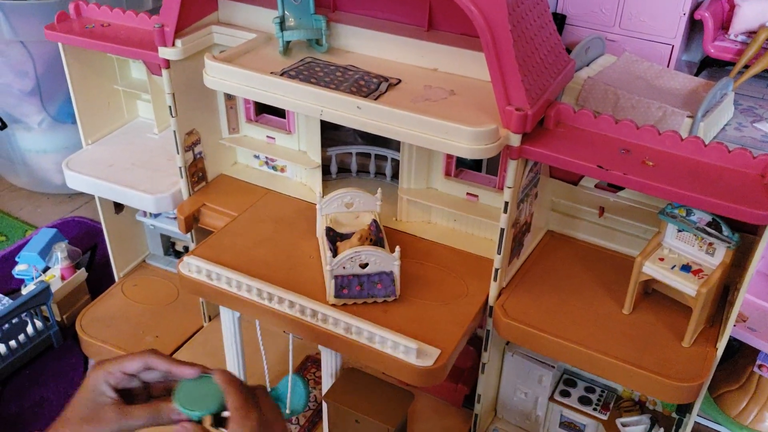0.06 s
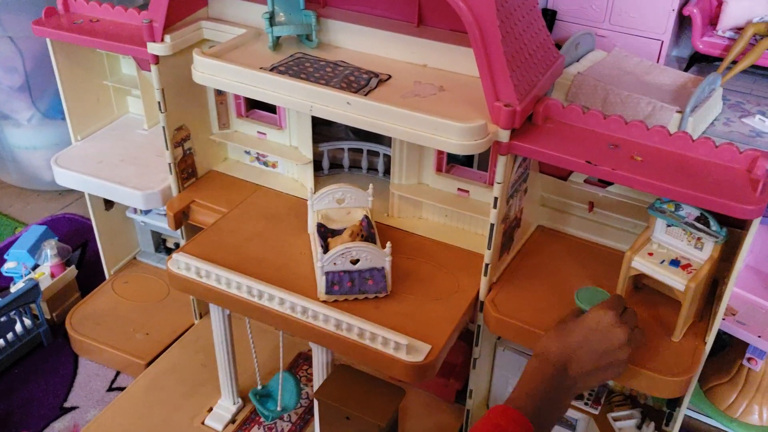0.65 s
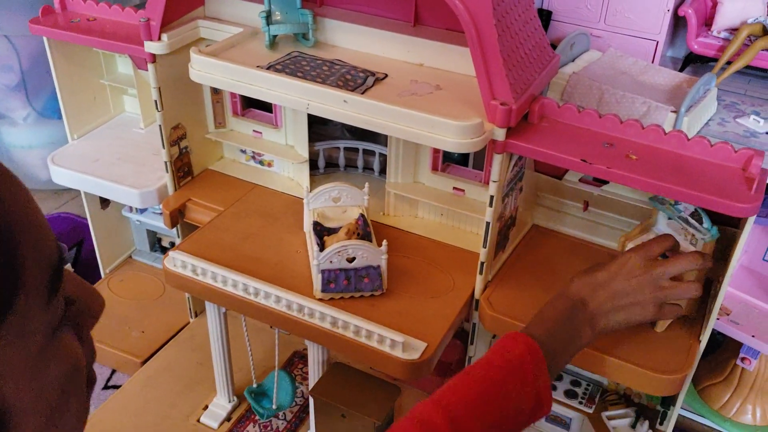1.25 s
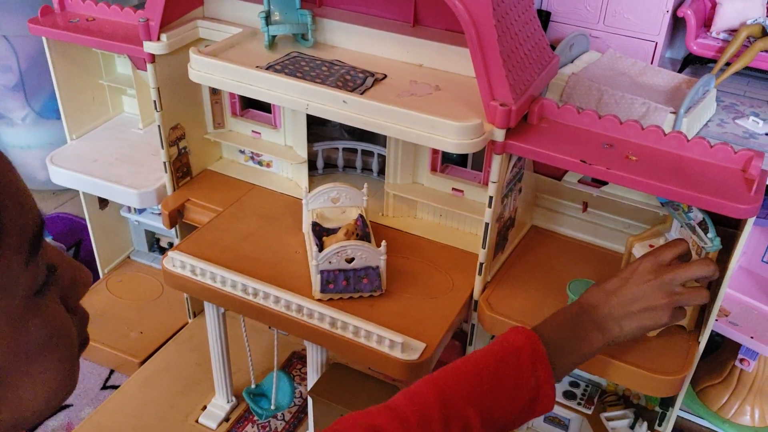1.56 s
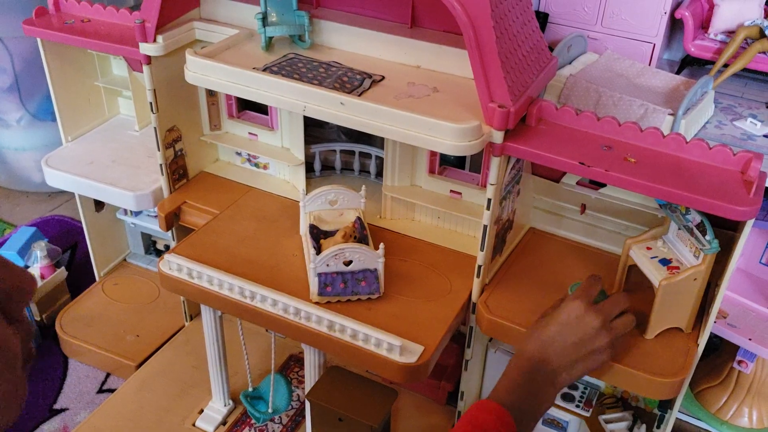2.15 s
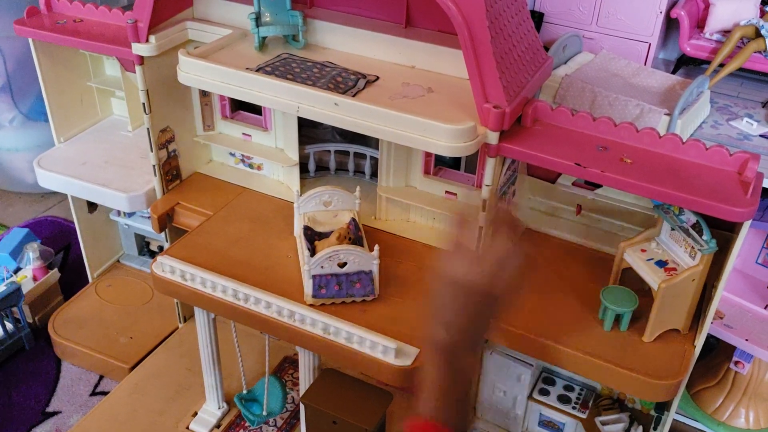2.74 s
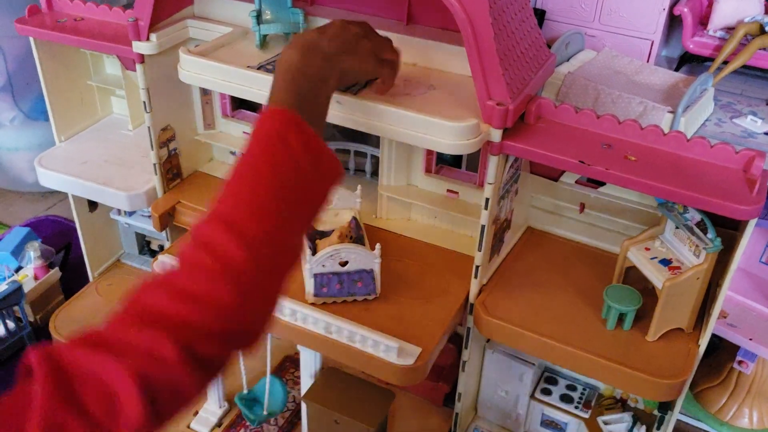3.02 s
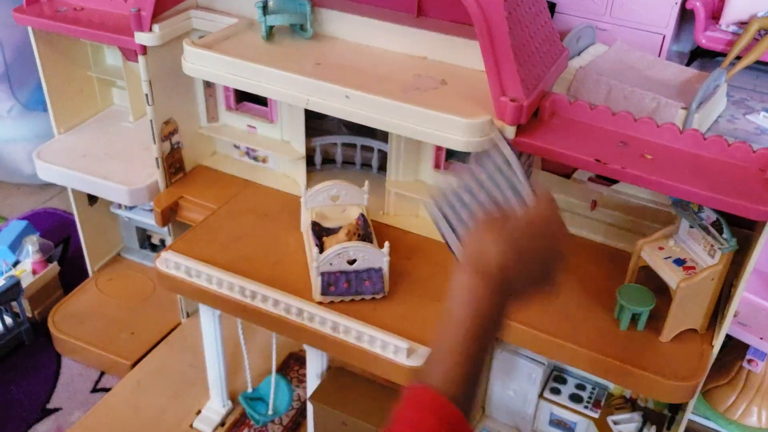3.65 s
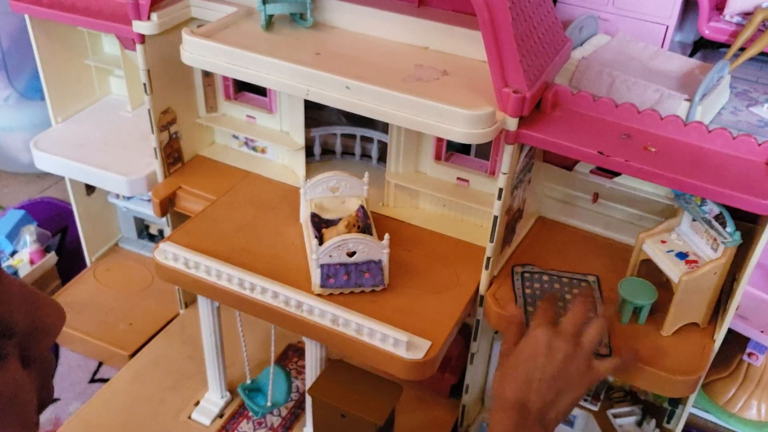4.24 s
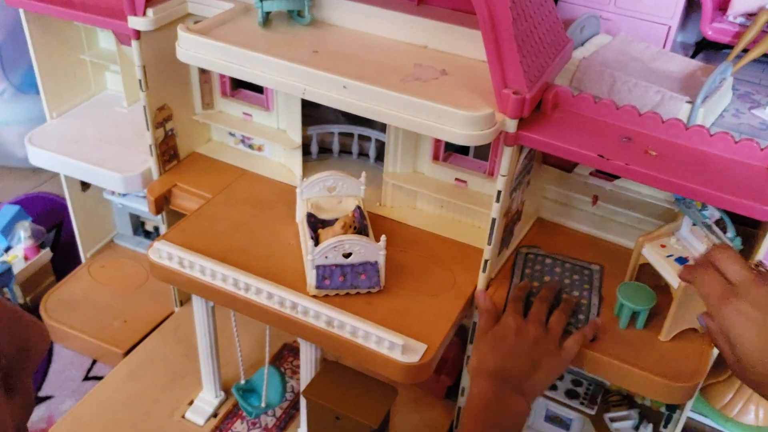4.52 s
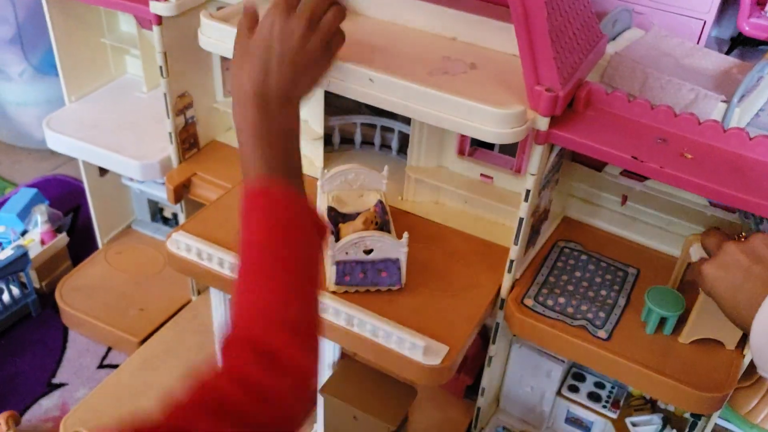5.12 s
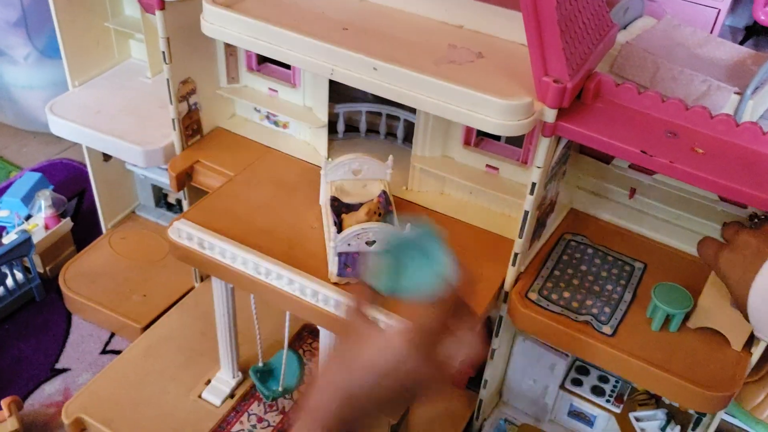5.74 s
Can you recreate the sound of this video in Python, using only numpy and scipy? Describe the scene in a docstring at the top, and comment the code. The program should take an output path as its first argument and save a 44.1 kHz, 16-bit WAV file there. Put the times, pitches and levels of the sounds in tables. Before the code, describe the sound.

Close to a plastic toy house in a quiet room, a hand rearranges tiny furniture. A stool lands with a hollow tap, then a vanity bumps and scrapes across the floor panel. In a softer stretch, a cloth rug is pulled away and brushed flat with a light hiss. The ending is busier, with crisp clicks, more dragging and the brief clatter of a small chair being lifted.

```python
"""Furnishing a toy house

Close to a hollow plastic toy house in a quiet room, in stereo. A hand sets down a stool, nudges and
drags a vanity, slides a cloth rug off the roof terrace and smooths it flat; a chair clatters as it is
picked up. Knocks ring the toys' shells, the floor panels and the frame; dragged feet stick and slip."""
import sys
import numpy as np
from scipy import signal
from scipy.fft import rfft, irfft, next_fast_len
from scipy.io import wavfile
from scipy.ndimage import uniform_filter1d

SR = 44100
rng = np.random.default_rng(int(sys.argv[2]) if len(sys.argv) > 2 else 0)


def wrap_up_sound(samples):
    """Save the sound to the file named by the first command line argument, as 16-bit audio."""
    columns = np.atleast_2d(samples).T
    # keep every value between -1 and 1, then stretch to whole-number steps
    tamed = np.clip(columns, -1, 1)
    steps = np.round(tamed * 32767).astype(np.int16)
    wavfile.write(sys.argv[1], SR, steps)


N = 263718
T = np.arange(SR // 2) / SR  # time within one contact [s]

# modes of the floor panels: (frequency [Hz], level [dB], t60 [s])
PANEL_MODES = [(322.1, -7, 0.084), (379.2, -0.5, 0.061), (430.6, -0.5, 0.075), (477.5, 0.5, 0.052),
               (543, 0.5, 0.075), (582, -1.5, 0.11), (664, -0.5, 0.072), (681.7, -5, 0.035)]
# modes of the toys' thin shells: (frequency [Hz], level [dB], t60 [s])
SHELL_MODES = [(824.6, -3, 0.096), (941, -0.5, 0.049), (1078, 3, 0.068), (1134.4, 2, 0.024),
               (1338, 3.5, 0.068), (1470, -1, 0.037), (1570, -10, .04), (1825, -0.5, .05),
               (1992, 2.5, 0.054), (2300, 1.5, 0.044), (2510, -1.5, 0.018), (2740, -2, .025),
               (3140, 1, 0.033), (3536, 1.5, 0.041), (4150, -6, .02), (4420, -3.5, 0.0259),
               (4850, -18.5, 0.023)]
# clack of crowded shell modes: (frequency [Hz], level [dB])
CLACK_SPECTRUM = [(450, -38), (750, -8.5), (1150, -6), (1900, -4), (3500, -16), (4800, -23.5),
                  (7000, -36.5)]
# contact of a hard edge: (frequency [Hz], level [dB])
EDGE_SPECTRUM = [(2000, -24), (4000, 5.5), (5500, -1.5), (8000, -3.5), (9500, -9), (11500, -5),
                 (16000, -18)]


def amp(db):
    """Decibels to gain."""
    return 10 ** (np.asarray(db) / 20)


def unit(x):
    """Scale to rms 1."""
    return x / np.sqrt(np.mean(x ** 2) + 1e-20)


def struck(x):
    """Scale a ring to rms 1 over its first 20 ms."""
    return x / np.sqrt(np.mean(x[..., :882] ** 2) + 1e-20)


def along(points, hz):
    """Read (Hz, value) points on a log axis."""
    f, v = np.transpose(points)
    return np.interp(np.log(hz + 1), np.log(f), v)


def filtered(x, response):
    """Filter x by a function of frequency."""
    n = x.shape[-1]
    m = next_fast_len(n + 8192)
    return irfft(rfft(x, m) * response(np.fft.rfftfreq(m, 1 / SR)), m)[..., :n]


def white(n):
    """Two channels of white noise."""
    return rng.standard_normal((2, n))


def pair(x):
    """Two unrelated signals become a left and right that agree in the bass."""
    # likeness at the two microphones: (frequency [Hz], correlation [0-1])
    likeness = [(100, 0.79), (400, 0.8), (1000, 0.29), (3000, 0.2), (12000, 0.24)]
    turn = lambda hz: np.arccos(along(likeness, hz)) / 2
    mid, side = filtered(x, lambda hz: np.array([np.cos(turn(hz)), np.sin(turn(hz))]))
    return np.array([mid + side, mid - side])


def coloured(x, spectrum):
    """Stereo sound of rms 1 with a given spectrum."""
    return unit(filtered(pair(x), lambda hz: amp(along(spectrum, hz))))


def decay(t60):
    """Fall by 60 dB in t60 seconds."""
    return np.exp(-np.log(1000) * T / t60)


def ring(modes, scatter_db, spot_hz=None, focus_db=0, reach=0.066, detune=0):
    """Damped modes; the struck spot favours those near its pitch, and each strike detunes them slightly."""
    hz, db, t60 = np.transpose(modes)
    hz = hz * (1 + detune * rng.standard_normal(len(hz)))
    db = db + scatter_db * rng.standard_normal(len(hz))
    if spot_hz:
        db = db + focus_db * np.exp(-(np.log(hz / spot_hz) / reach) ** 2)
    sign = (-1) ** np.arange(len(hz))
    phase = rng.normal(0, 1.0, (len(hz), 1))
    return (sign * amp(db)) @ (np.sin(2 * np.pi * hz[:, None] * T + phase) * decay(t60[:, None]))


def through(force, response):
    """A force on both channels drives a ringing body."""
    return signal.fftconvolve(force, response[None], axes=1)[:, :force.shape[1]]


def add(track, s, sound):
    """Lay a sound on the track at s seconds."""
    part = track[:, round(s * SR):][:, :sound.shape[-1]]
    part += sound[..., :part.shape[-1]]


def slips(rate, spread_db):
    """Friction as tiny slips of uneven size at random moments, at rms 1."""
    moments = rng.random(N) < rate / SR
    sizes = amp(spread_db * np.clip(rng.standard_normal(N), -2, 2))
    return unit(moments * sizes * white(N))


def patchy(x, depth_db):
    """Shifting contact brightens and dulls patches of the spectrum."""
    spectra = signal.stft(x, nperseg=512)[2]
    patches = uniform_filter1d(rng.standard_normal(spectra.shape[1:]), size=8, axis=0)
    patches = unit(uniform_filter1d(patches, size=7, axis=1))
    return unit(signal.istft(spectra * amp(depth_db * patches), nperseg=512)[1][:, :N])


def stroke(start, length, peak_at, swell_db, fade_s=0.008):
    """Gain of one hand movement: it reaches full speed at a share of its length, slows and stops."""
    progress = (np.arange(N) / SR - start) / length
    gate = np.clip(np.minimum(progress, 1 - progress) * length / fade_s + 1, 0, 1)
    return gate * amp(np.interp(progress, [0, peak_at, 1], [-swell_db, 0, -swell_db]))


def placed(x, lag_s, low_hz=48):
    """The small house radiates little deep bass; the left microphone hears it lag_s after the right."""
    # left over right: (frequency [Hz], level [dB])
    balance = [(200, 1.2), (550, -2), (1100, 4.1), (2200, 0), (5000, 1.5), (10000, 6)]
    side = np.array([[1], [-1]]) / 2
    low_cut = lambda hz: (1j * hz) ** 2 / (low_hz ** 2 - hz ** 2 + 1j * np.sqrt(2) * hz * low_hz)
    delay = lambda hz: np.exp(-2j * np.pi * hz * lag_s * side)
    return filtered(x, lambda hz: low_cut(hz) * amp(side * along(balance, hz)) * delay(hz))


def room_tone():
    """The steady air of a still room, mostly low rumble."""
    # still air: (frequency [Hz], level [dB])
    spectrum = [(12, -25), (20, -10.5), (86, -5.5), (446, -34), (590, -35.5), (1530, -35.5), (1910, -38),
                (2140, -31), (2320, -36), (3530, -34), (4670, -38.5), (11100, -37), (16000, -36)]
    return coloured(white(N), spectrum)


def room(x):
    """Walls answer after a short delay; the bass lingers longest."""
    # reverberation time: (frequency [Hz], t60 [s])
    reverb_times = [(120, 0.65), (500, 0.25), (2000, 0.32), (6000, 0.27), (14000, 0.29)]
    hz, t, spectra = signal.stft(pair(white(len(T))), SR, nperseg=256)
    fading = np.exp(-np.log(1000) * t / along(reverb_times, hz)[:, None])
    tail = signal.istft(spectra * fading, SR, nperseg=256)[1]
    tail = tail[:, :len(T)] * (1 - decay(0.027)) ** 2
    return signal.fftconvolve(x, tail / np.linalg.norm(tail[0]), axes=1)[:, :N]


def fingers():
    """Fingertips scuff faintly as they shift their grip on the vanity."""
    # skin on smooth plastic: (frequency [Hz], level [dB])
    skin = [(600, -14), (1500, 2.5), (2800, -10), (4200, 2.5), (5500, -14), (12000, -18)]
    scuff = coloured(slips(rate=1200, spread_db=0.5) + 0.7 * white(N), skin)
    return amp(-60) * stroke(start=1.69, length=.06, peak_at=.55, swell_db=15) * scuff


def bumps():
    """The soft hand rocks the whole house in its lowest modes."""
    # hand against the house: (time [s], level [dB])
    contacts = [(1.799, -40), (1.879, -41), (3.09, -42), (3.195, -43), (5.527, -38.5)]
    # the house rocking on its base: (frequency [Hz], level [dB], t60 [s])
    sway_modes = [(52, 0, .16), (76, -1, .15), (104, -4, .11)]
    out = np.zeros((2, N))
    for s, db in contacts:
        sway = ring(sway_modes, scatter_db=1) * (1 - decay(.05))
        add(out, s, amp(db - 12) * struck(sway))
    return out


def squeaks():
    """A smooth edge sticks and slips for an instant in a narrow band."""
    # plastic against plastic: (time [s], level [dB], pitch [Hz])
    contacts = [(5.3194, -56.5, 3470), (5.3712, -45, 3210), (5.8015, -54, 5560)]
    out = np.zeros((2, N))
    for s, db, pitch_hz in contacts:
        band = lambda hz: np.exp(-((hz / pitch_hz - 1) / .16) ** 2)
        tone = unit(filtered(pair(white(len(T))), band))
        add(out, s, amp(db + 6.5) * struck(tone * decay(0.059) * (1 - decay(0.0067))))
    return out


def rug(hiss, murmur, spectrum, crackle_db, patchy_db):
    """Countless fibres catch on the textured floor, which murmurs under the pressing hand."""
    # the rubbed floor: (frequency [Hz], level [dB])
    floor_spectrum = [(35, -21), (60, -40.5), (99, 4.5), (206, -5), (392, 6), (628, 0), (842, -7),
                      (975, -22), (1050, -6.5), (1390, -11), (1510, -5), (1680, -21), (2000, -7),
                      (2600, -52), (4400, -120)]
    snags = amp(crackle_db) * slips(rate=200, spread_db=6)
    fibres = patchy(slips(rate=12000, spread_db=3) + 1.3 * white(N) + snags, patchy_db)
    floor = coloured(white(N), floor_spectrum)
    return amp(2.1) * hiss * coloured(fibres, spectrum) + amp(-2.0) * murmur * floor


def rug_moved():
    """Each tug starts briskly and runs out; the floor falls quiet as the rug leaves it."""
    # pinch, pull, lift and lay down: (start [s], length [s], fibre hiss [dB], floor murmur [dB])
    tugs = [(2.98, .08, -68, -70), (3.092, .06, -55, -45), (3.14, .4, -50.3, -48), (3.475, .06, -57, -66),
            (3.58, .36, -59.5, -72), (3.948, .13, -55.5, -54)]
    # cloth sliding off the terrace: (frequency [Hz], level [dB])
    cloth = [(530, -34), (900, -15), (1290, -18), (1510, -5), (1920, -18.5), (2220, -10), (3510, -2.5),
             (4360, -7), (7770, -3), (9200, -5), (15100, -3.5), (16000, -9)]
    hiss = sum(amp(db) * stroke(s, length, peak_at=.06, swell_db=12) for s, length, db, _ in tugs)
    murmur = sum(amp(db) * stroke(s, length, peak_at=.06, swell_db=40) for s, length, _, db in tugs)
    return rug(hiss, murmur, cloth, crackle_db=-3, patchy_db=2.2)


def rug_smoothed():
    """One even sweep of the palm presses the rug flat."""
    # cloth under the palm: (frequency [Hz], level [dB])
    cloth = [(530, -52), (900, -38), (1290, -36), (1920, -39), (2250, -12.5), (3300, -2), (3770, 4.5),
             (5550, -3.5), (6970, -3.5), (7770, 2), (8760, -3), (12000, 2), (15100, -3), (16000, -14)]
    sweep = stroke(start=4.41, length=.305, peak_at=.42, swell_db=7.5, fade_s=.022)
    return rug(amp(-46.7) * sweep, amp(-58) * sweep, cloth, crackle_db=-12, patchy_db=.6)


def drags():
    """Dragged feet stick and slip: the slips rasp in the toy's shell and keep the floor ringing."""
    # feet on a floor: (start [s], length [s], panel level [dB], rasp offset [dB], hiss offset [dB])
    moves = [(1.205, .2, -45.5, -3.5, -8), (1.4, .125, -45.5, -4, -19), (2.262, .06, -47.5, 1, -26),
             (2.305, .085, -45.5, 2, -20), (2.365, .11, -50, -4, -26), (4.775, .09, -52, 0, -14),
             (5.015, .14, -52, -7, -5), (5.205, .23, -56.5, 0, 1), (5.42, .085, -55, -5, -5),
             (5.655, .125, -54, -2, -9), (5.77, .14, -49, -3, -4)]
    # scraping plastic: (frequency [Hz], level [dB])
    scrape = [(410, -26.5), (700, -3.5), (750, 5.5), (1230, -5.5), (1340, -0.5), (1690, -11.5), (1860, 1),
              (2510, -11.5), (3090, -9.5), (5500, -36), (7150, -61), (12100, -120)]
    panel_gain, rasp_gain, hiss_gain = sum(
        np.outer(amp([db, db + rasp_db, db + hiss_db]), stroke(s, length, peak_at=.47, swell_db=14))
        for s, length, db, rasp_db, hiss_db in moves)
    grains = slips(rate=1200, spread_db=2.0)
    panel = unit(through(pair(grains), ring(PANEL_MODES, scatter_db=0)))
    hollow = unit(through(pair(grains), ring(SHELL_MODES, scatter_db=0)))
    friction = patchy(grains + 0.46 * white(N), depth_db=2.5)
    rasp = amp(3) * coloured(friction, scrape) + amp(-2.5) * hollow
    hiss = coloured(friction + white(N), EDGE_SPECTRUM)
    return amp(5.5) * panel_gain * panel + rasp_gain * rasp + amp(6.5) * hiss_gain * hiss


def taps():
    """Fingertips and rocking feet are too soft to wake much besides the floor panel."""
    # soft taps: (time [s], level of the first contact [dB], contacts [count])
    touches = [(0.48, -55, 1), (0.81, -37.5, 4), (1.641, -48, 1), (1.96, -56, 3), (2.137, -41, 1),
               (2.551, -39, 2), (3.139, -43, 1), (4.911, -35.5, 1), (5.021, -33, 3), (5.941, -50, 1)]
    rock_s, loss_db = .048, 3.5  # from one foot to the next
    out = np.zeros((2, N))
    for s, db, count in touches:
        for k in range(round(count)):
            modes = ring(PANEL_MODES, scatter_db=2, spot_hz=550, focus_db=6, detune=.03)
            panel = struck(modes * decay(0.0803) * (1 - decay(.008)))
            clack = 0.37 * coloured(white(len(T)), CLACK_SPECTRUM) * decay(.06)
            add(out, s + k * rock_s, amp(db - 13 - k * loss_db) * (panel + clack))
    return out


def ticks():
    """A fingernail snaps on the plastic with almost no ring."""
    # dry ticks: (time [s], level [dB])
    contacts = [(0.631, -51), (3.0465, -30), (3.3777, -32), (3.8887, -43.5), (4.748, -19), (4.7596, -8),
                (5.5585, -10)]
    snap = decay(.022) * (1 - decay(.003))
    out = np.zeros((2, N))
    for s, db in contacts:
        add(out, s, amp(db - 13.5) * coloured(white(len(T)), EDGE_SPECTRUM) * snap)
    return out


def stool():
    """The legs clack, then the stool's hollow notes swell and beat against each other."""
    # the stool lands: (time [s], level [dB], clack offset [dB])
    landings = [(0.718, -18.5, -10.5)]
    # its hollow body: (frequency [Hz], level [dB], t60 [s])
    body_modes = [(392.5, 1, 0.077), (549, -3.5, 0.0926), (599, -8.5, 0.12), (820, -16.5, 0.06),
                  (926, -16.5, 0.11)]
    # its stiff legs: (frequency [Hz], level [dB])
    legs = [(1500, -25), (2200, 0), (2900, -9), (3600, -9.5), (4600, -14), (7000, -34.5)]
    out = np.zeros((2, N))
    for s, db, clack_db in landings:
        note = struck(ring(body_modes, scatter_db=2.5) * (1 - decay(0.071)))
        clack = struck(coloured(white(len(T)), legs) * decay(.11))
        add(out, s, amp(db - 8) * (note + amp(clack_db + 3) * clack))
    return out


def floor_panel(spot_hz):
    """The panel gives way at once where it is struck, then rings on in its modes."""
    push = struck(np.sin(2 * np.pi * spot_hz * T) * decay(0.049))
    modes = ring(PANEL_MODES, scatter_db=1.5, spot_hz=spot_hz, focus_db=6.5)
    return struck(struck(modes * (1 - decay(0.007))) + 0.68 * push)


def toy_shell(spot_hz):
    """The loose parts of a toy chatter briefly and drive its shell."""
    chatter = white(len(T)) * (decay(0.0088) + 0.74 * decay(.1))
    modes = ring(SHELL_MODES, scatter_db=0.5, spot_hz=spot_hz, focus_db=10.5, reach=0.19, detune=0.028)
    hollow = struck(through(pair(chatter), modes))
    return struck(hollow + .9 * struck(coloured(chatter, CLACK_SPECTRUM)))


def knocks():
    """Each contact ticks at the edge, clacks in the toy, and rings the floor and frame under it."""
    # a toy hits the house: (time [s], level [dB], hardness [0-1], frame re panel [dB], panel pitch [Hz])
    contacts = [(0.715, -24, .52, -33, 390), (1.218, -29, .34, -20, 520), (1.236, -24.5, .5, -19, 485),
                (1.259, -25, .36, -16, 545), (1.275, -21.5, .48, -20, 510), (1.331, -30, .52, -11, 470),
                (1.41, -27.5, .77, -17, 490), (1.423, -29, .62, -6, 580), (1.544, -32.5, .42, -7, 510),
                (1.818, -34, .12, -24, 535), (1.88, -41, .26, -17, 385), (2.101, -31.5, 0, -15, 365),
                (2.205, -45, .2, -18, 405), (2.421, -35, .12, -12, 565), (2.534, -39, .05, -19, 515),
                (3.088, -50, .74, 1, 325), (3.195, -36.5, .62, -2, 700), (3.945, -57, .95, -16, 550),
                (4.195, -55, .38, -13, 440), (4.75, -36, .88, -20, 525), (4.762, -31, .7, -18, 595),
                (4.857, -27, .35, -15, 490), (4.977, -36.5, .28, -15, 505), (5.066, -38, .1, -10, 555),
                (5.09, -30, .32, -20, 545), (5.173, -46, .38, -11, 465), (5.278, -29.5, .81, -10, 575),
                (5.363, -35.5, .66, -13, 735), (5.371, -43, .88, 0, 680), (5.502, -35, .76, -3, 480),
                (5.52, -24, .56, -9, 380), (5.526, -19, .52, -11, 590), (5.558, -25.5, .62, -16, 470),
                (5.562, -21, .66, -16, 415), (5.668, -38, 1, -14, 445), (5.824, -38.5, .96, -2, 580),
                (5.842, -36, .86, -5, 355)]
    # the whole frame: (frequency [Hz], level [dB], t60 [s])
    frame_modes = [(80.9, -22, 0.073), (100.8, -17.5, .18), (148.5, -0.5, 0.4), (168.4, 0.5, .18),
                   (207.7, -3.5, 0.13), (280, 7.5, .11), (325, 0, .13)]
    edge_envelope = (decay(0.039) + 0.17 * decay(0.11)) * (1 - decay(.007))
    out = np.zeros((2, N))
    for s, db, hardness, thud_db, spot_hz in contacts:
        # a harder contact wakes more shell and edge; the hardest favour higher shell modes
        shell_db = np.interp(hardness, [0, 1], [-13, 5.5])
        edge_db = np.interp(hardness, [0, 1], [-38, 5])
        shell_hz = 830 * 2 ** (2.1 * hardness ** 6 + rng.normal(0, .12))
        frame = amp(thud_db) * struck(ring(frame_modes, scatter_db=2) * (1 - decay(.018)))
        panel = floor_panel(spot_hz)
        shell = amp(shell_db) * toy_shell(shell_hz)
        edge = amp(edge_db) * struck(coloured(white(len(T)), EDGE_SPECTRUM) * edge_envelope)
        add(out, s, amp(db - 7.5) * (panel + frame + shell + edge))
    return out


def scene():
    """Toys in the house's right wing and the rug on the terrace, close up over faint room tone."""
    wing = knocks() + taps() + stool() + ticks() + squeaks() + bumps()
    wing += drags() + fingers() + rug_smoothed()
    terrace = rug_moved()
    direct = placed(wing, lag_s=0.00013) + placed(terrace, lag_s=-0.000044)
    return direct + amp(-11.0) * room(wing + terrace) + amp(-67.5) * room_tone()


def record(dry):
    """The recorder keeps nothing above 16.3 kHz."""
    return filtered(dry, lambda hz: hz < 16300)


dry = scene()
out = record(dry)
wrap_up_sound(out)
```